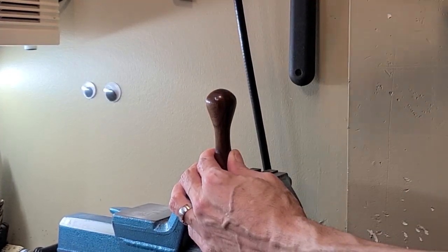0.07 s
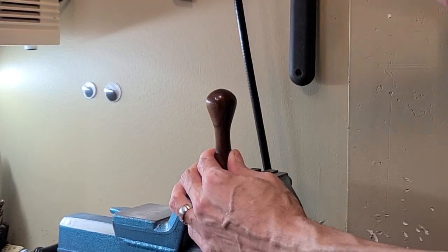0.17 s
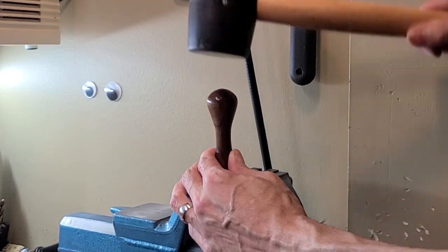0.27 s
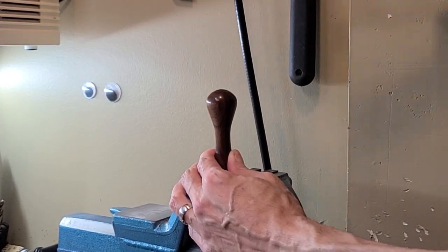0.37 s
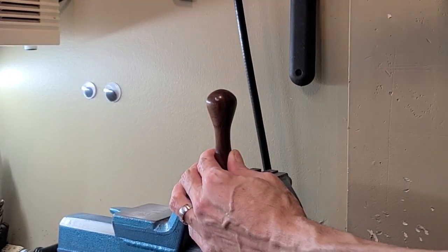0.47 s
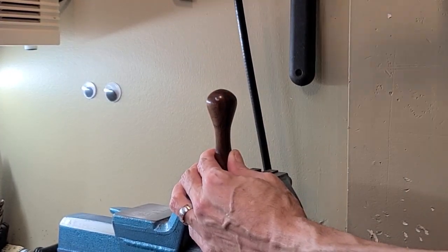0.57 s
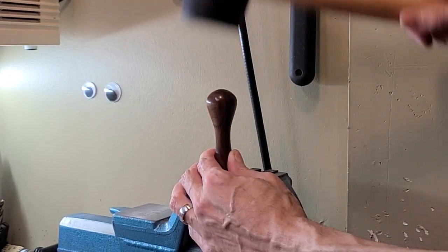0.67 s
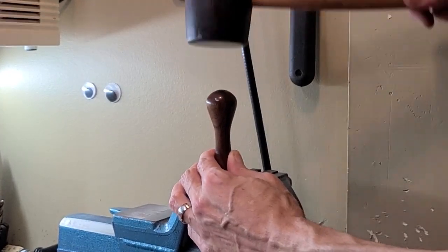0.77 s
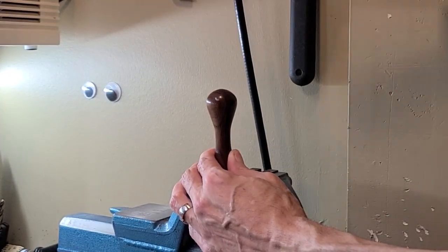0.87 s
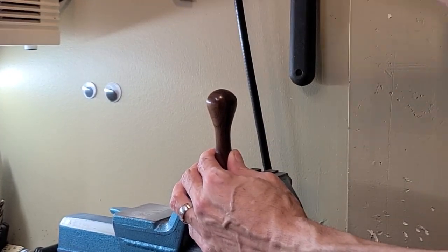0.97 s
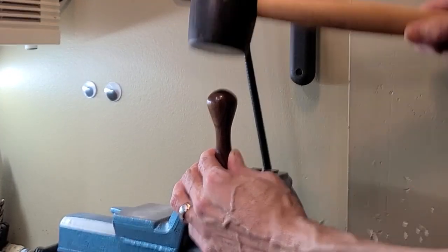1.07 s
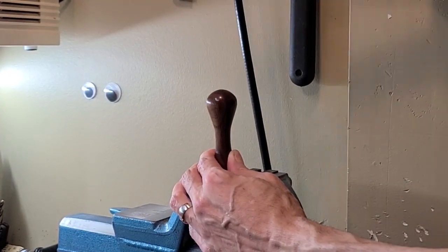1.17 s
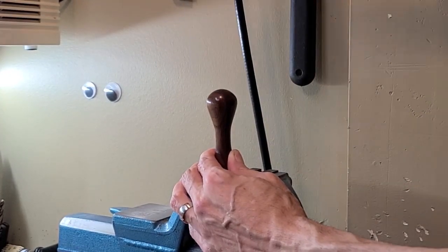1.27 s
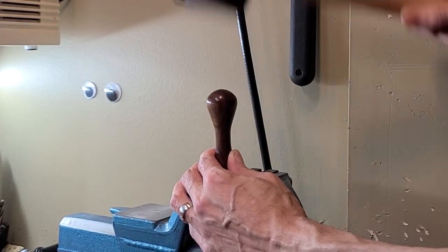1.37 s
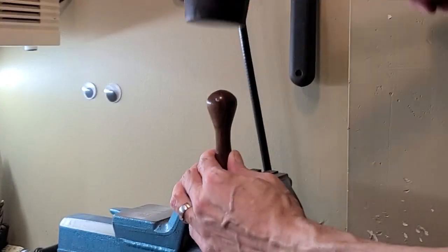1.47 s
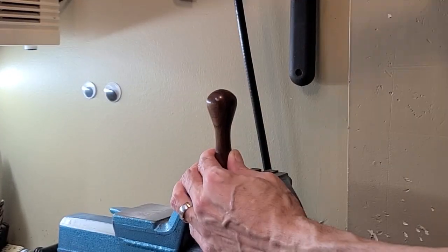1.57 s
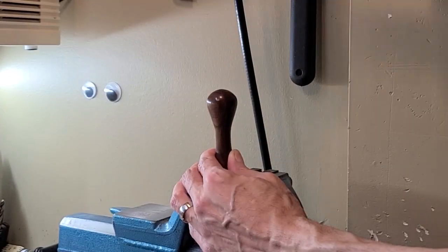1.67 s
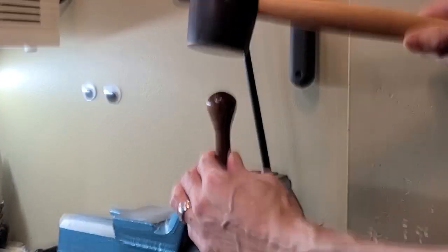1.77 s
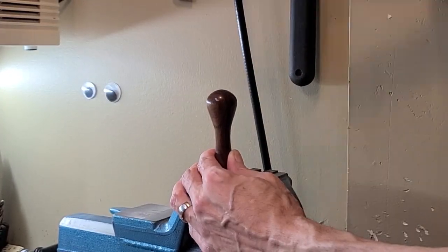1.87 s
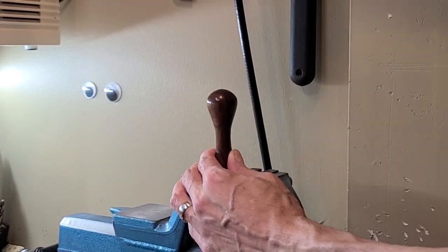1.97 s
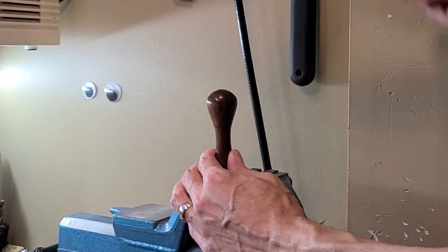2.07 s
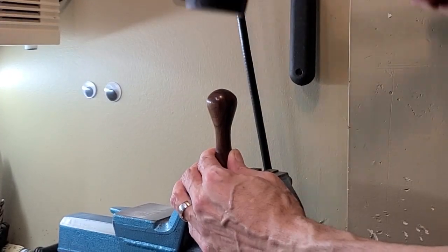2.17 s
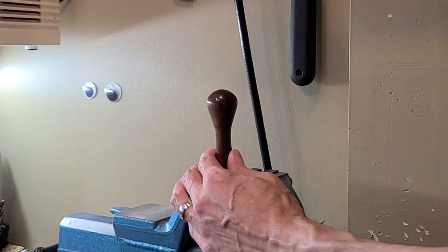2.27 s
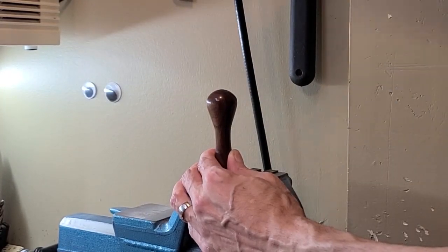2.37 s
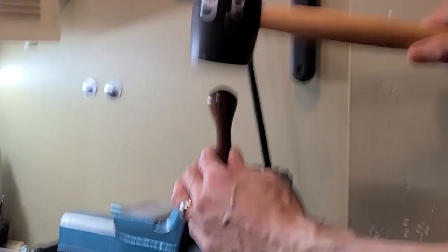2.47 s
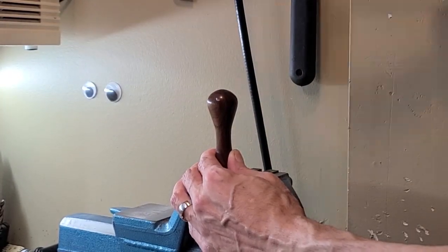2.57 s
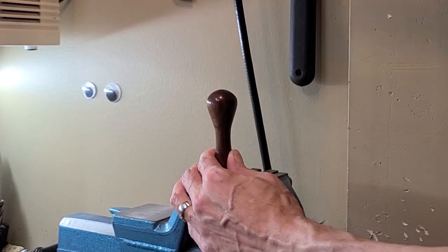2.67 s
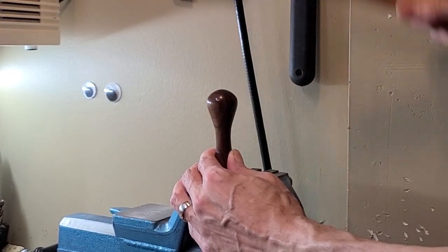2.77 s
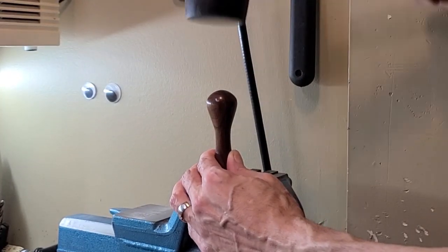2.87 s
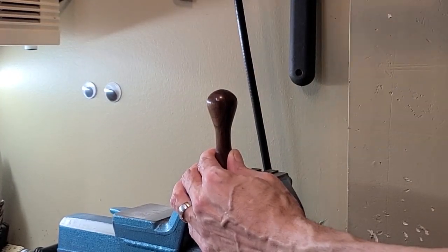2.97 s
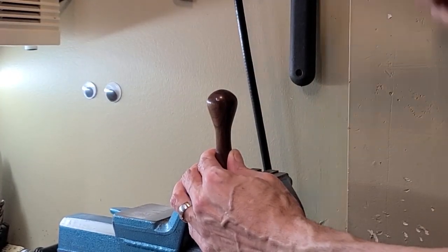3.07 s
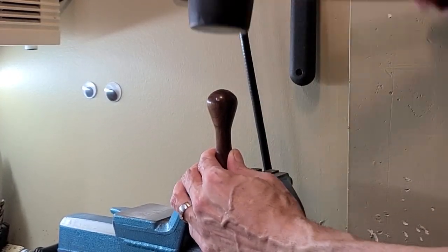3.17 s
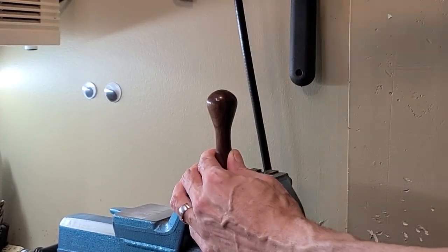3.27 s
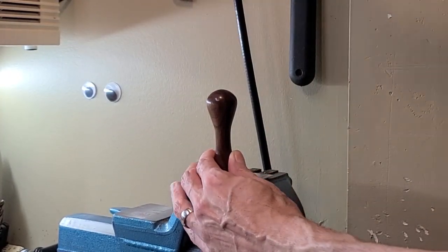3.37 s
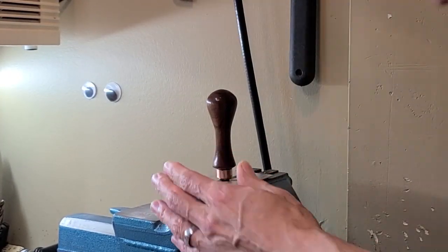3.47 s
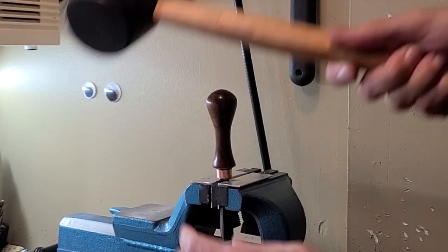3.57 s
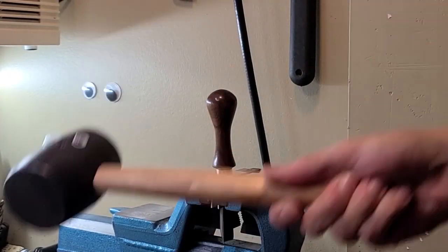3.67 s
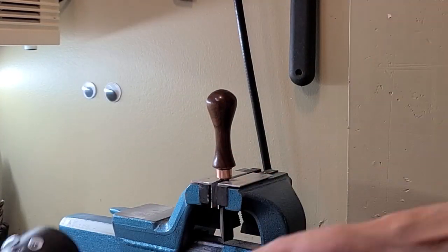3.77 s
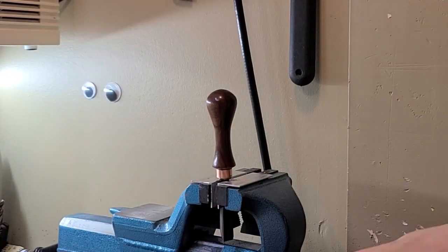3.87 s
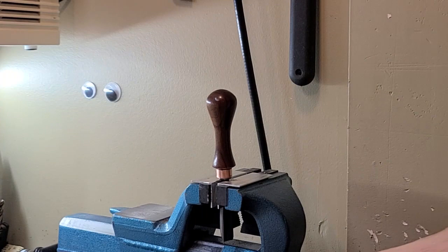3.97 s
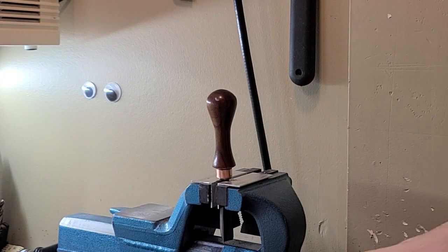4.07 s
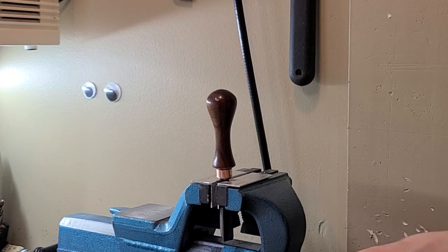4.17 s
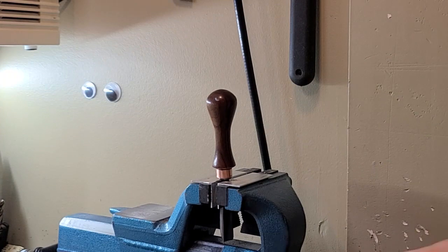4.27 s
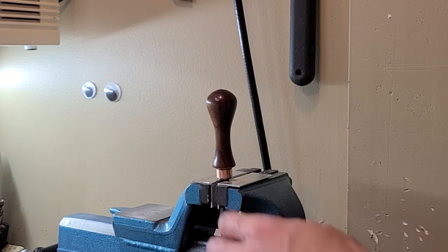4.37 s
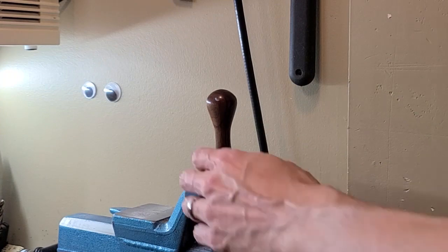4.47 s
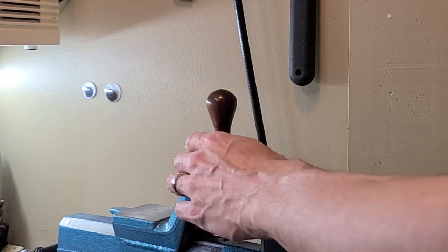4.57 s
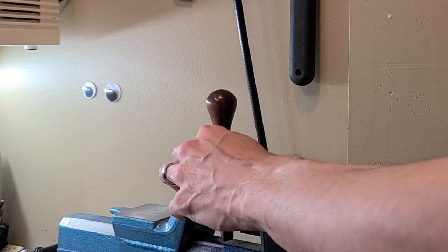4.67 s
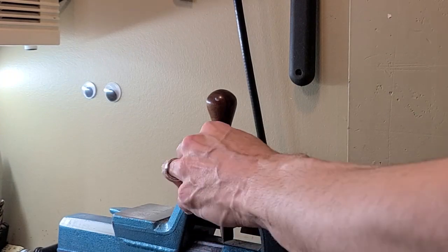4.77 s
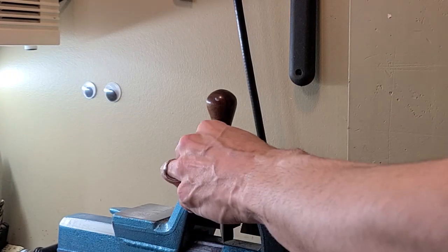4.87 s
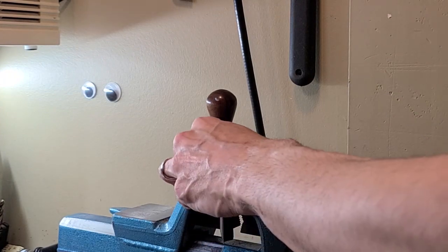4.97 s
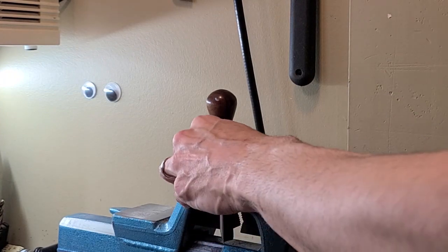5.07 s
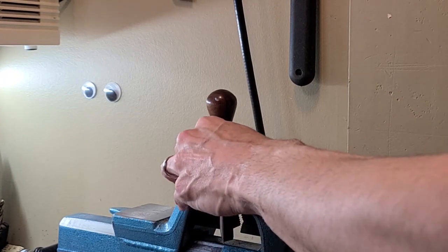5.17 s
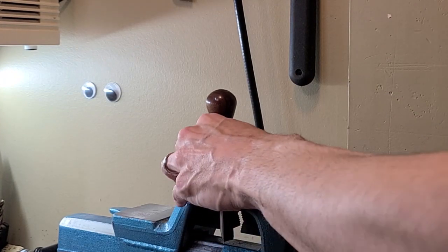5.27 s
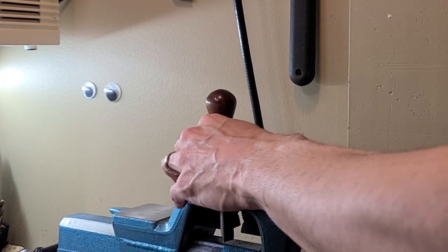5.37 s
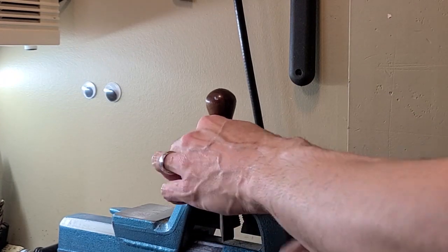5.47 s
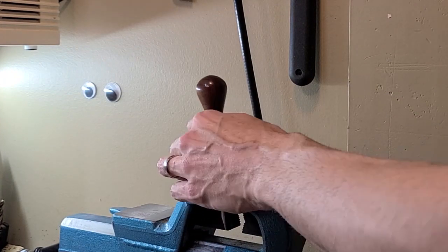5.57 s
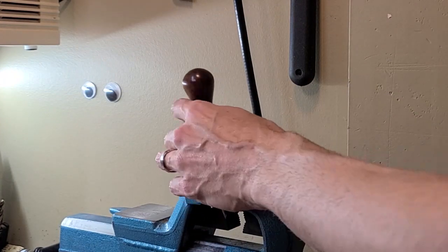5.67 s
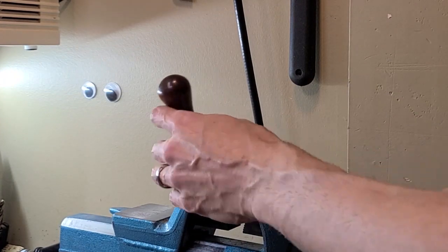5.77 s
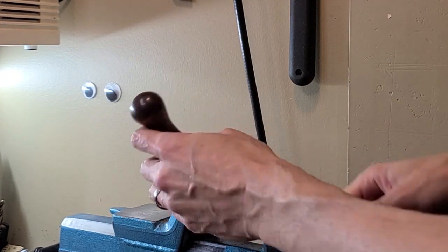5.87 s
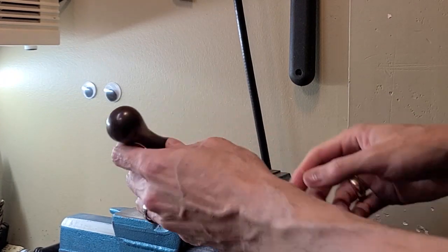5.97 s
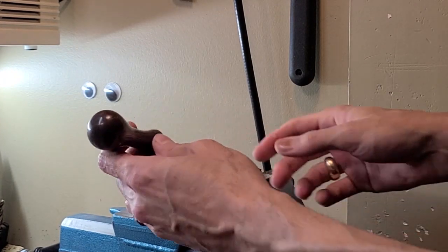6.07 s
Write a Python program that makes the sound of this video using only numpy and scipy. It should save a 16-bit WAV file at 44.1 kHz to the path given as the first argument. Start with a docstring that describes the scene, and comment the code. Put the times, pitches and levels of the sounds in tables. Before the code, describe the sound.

A steady run of close, loud mallet blows lands on a wooden handle held in a bench vice, each a deep thud and woody knock with a brief jingle of small steel parts. The hammering stops after about three seconds. Much quieter handling follows in the still workshop: a ringing clink from the vice, a few bumps, skin rubbing on wood, a short steel scrape as the tool comes free, and some light ticks.

```python
"""A small workshop: a rubber mallet drives a wooden handle onto a tool clamped in a bench vice.
Each blow thumps the bench, knocks in the wood and shakes loose hardware into a short rattle.
Then steel clinks, a hand takes hold, the vice is loosened and the tool scrapes out of its jaws.
Impacts are decaying modes and noise bursts; friction is grainy noise. Air and hum lie underneath."""
import sys
import numpy as np
from scipy import signal
from scipy.fft import rfft, irfft, next_fast_len
from scipy.io import wavfile

SR = 44100
rng = np.random.default_rng(int(sys.argv[2]) if len(sys.argv) > 2 else 0)


def store_wav(level_fs):
    """Save 16-bit WAV to argv[1]."""
    pcm = np.round(np.clip(np.atleast_2d(level_fs), -1, 1) * 32767)
    wavfile.write(sys.argv[1], SR, pcm.T.astype(np.int16))


N = 270320
T = np.arange(N) / SR
RING_T = T[:int(1.4 * SR)]

# mallet blows: start_s, level_db, crack_db
BLOW_HITS = [(-.058, -2, -20), (0.2822, -2.5, 9.5), (0.741, -1.5, -26.5), (1.0856, -2, 0), (1.438, -1, -30),
             (1.79, -1.5, -7.5), (2.151, -1.5, -38.5), (2.5037, -1.5, -32.5), (2.8386, -2, -15.5),
             (3.1523, -2, -36.5)]
# bench, vice and handle as one body: pitch_hz, level_db, t60_s
BENCH_MODES = [(41.4, -21.5, 0.19), (42.62, -26, 1), (70.8, -19, 0.45), (88.2, -7.5, 0.15),
               (105.9, -17, 0.028), (113, -10.5, 0.18), (174, -31.5, 0.095), (219.8, -21, 0.22),
               (244.9, -16.5, 0.17), (314, -15, 0.17), (386, -27, 0.1), (419, -21.5, 0.2),
               (448.7, -13, 0.11), (502.3, -24.5, 0.204), (548, -30.5, 0.29), (589.3, -13.5, 0.096),
               (585, -24, 0.17), (648, -27.5, 0.092), (775.6, -19.5, 0.14), (829.5, -19.5, 0.133),
               (878, -24, 0.12), (1024, -25.5, 0.18), (1151, -31.5, 0.29), (1404, -29.5, 0.21),
               (1427, -35, 0.064), (1670, -22, 0.026)]
# dense resonances of wood, vice and room: freq_hz, octave_level_db, t60_s
KNOCK_BANDS = [(63.3, -34.5, 0.58), (248.5, -27.5, 0.2), (550, -25, 0.21), (960, -20, 0.077),
               (1690, -25.5, 0.15), (2400, -31.5, 0.2), (4096, -38.5, 0.21), (7540, -38, 0.044),
               (10000, -49, 0.089), (16070, -37.5, .1)]
# wood slipping on the tang: freq_hz, octave_level_db, t60_s
CRACK_BANDS = [(504.8, -44, .05), (1598, -33.5, .08), (3020, -32, 0.22), (4960, -32.5, 0.18),
               (6600, -19, 0.068), (9200, -31.5, 0.051), (12400, -29, 0.097), (15000, -34.5, .07)]

def mallet(seated_db=8, cushion_db=5, seating_blows=5.4, shared_power=0.72, rattle_db=2.5):
    """Blows ring bench and wood and throw the hardware; the handle cushions less as it seats."""
    out = np.zeros((2, N))
    bench = ring(BENCH_MODES, spread_hz=1200) * rise(RING_T, 0.00012)
    wood = burst(KNOCK_BANDS)
    parts = ring(HARDWARE_MODES, spread_hz=1400) * undb(-50)
    t = T[:wood.shape[1]]
    rubber_squash = rise(t, 0.003)
    for k, (start_s, level_db, crack_db) in enumerate(BLOW_HITS):
        loss_db = cushion_db * np.exp(-(k / seating_blows) ** 2)
        knock = np.sqrt(shared_power) * wood + np.sqrt(1 - shared_power) * burst(KNOCK_BANDS)
        add(out, start_s, undb(level_db) * shove())
        add(out, start_s, -undb(level_db) * bench)
        add(out, start_s, undb(level_db + seated_db - loss_db) * rubber_squash * knock)
        add(out, start_s, undb(level_db + rattle_db - 0.48 * loss_db) * rattle(t, parts))
        add(out, start_s, undb(crack_db) * burst(CRACK_BANDS) * rise(t, 0.00052))
    return out


def shove(level_db=-9, length_s=0.0032):
    """The handle jerks down and stops: one swing of pressure."""
    phase = np.pi * T[:int(length_s * SR)] / length_s
    return -undb(level_db) * np.sin(2 * phase) * np.sin(phase)


# loose hardware on the bench: freq_hz, octave_level_db, t60_s
RATTLE_BANDS = [(400, -54, 0.72), (900, -46, 0.36), (1400, -43.5, 0.3), (2340, -48, 0.34),
                (4220, -36.5, 0.29), (5130, -43, 0.29), (6140, -34, 0.31), (8440, -34, 0.24),
                (9300, -44, 0.26), (11900, -38, 0.24), (14000, -46, 0.25), (15120, -41, .2)]
# loose steel parts: pitch_hz, level_db, t60_s
HARDWARE_MODES = [(990, -9, .18), (1378, -2, .2), (1452, -8, .14), (1665, -7, .08), (1925, -8, .06),
                  (2079, -7, .08), (3547, -12, .13), (4166, -4, .16), (6240, -3, .15), (6325, -3, .16),
                  (8240, -4, .13), (11300, -11, .11)]

def rattle(t, parts, lift_s=0.0093, land_s=0.078, settle_s=0.2):
    """Hardware is thrown up, chatters, swells as it lands and comes to rest."""
    thrown = rise(t, lift_s) * (1 + 1.78 * (1 - np.exp(-(t / 0.024) ** 2)))
    landing = 1 + undb(-6) * np.exp(-((t - land_s) / 0.0068) ** 2)
    settling = 1 / np.sqrt(1 + (t / settle_s) ** 6)
    clatter = burst(RATTLE_BANDS) * grain(len(t), rate_hz=180, depth_db=3)
    steel = chatter(thrown * np.exp(-t / 0.028), parts, rate_hz=1100)
    return clatter * thrown * landing * settling + steel


# plate buzzes: start_s, level_db, length_s
PLATE_BUZZES = [(0.426, -58.5, 0.034), (0.794, -32.5, 0.022), (1.905, -41.5, 0.018), (2.619, -46.5, 0.055)]
# loose plate: pitch_hz, level_db, t60_s
PLATE_MODES = [(1010, -9, .1), (1345, -7, .09), (1382, -3, .13), (1450, -8, .1), (1560, -12, .08),
               (1830, -18, .08), (4166, -15, .08)]

def loose_plate():
    """A plate taps against the shaking bench after some blows."""
    out = np.zeros((2, N))
    plate = ring(PLATE_MODES, spread_hz=330)
    for start_s, level_db, length_s in PLATE_BUZZES:
        add(out, start_s, undb(level_db) * chatter(RING_T < length_s, plate, rate_hz=650) / 2)
    return out


# ticks of loose parts: start_s, level_db, pin_db
TICK_HITS = [(.134, -56, -73), (0.908, -52.5, -60), (1.579, -52.5, -59), (2.568, -30.5, -57),
             (3.093, -60, -79), (4.588, -35, -64), (5.838, -49.5, -57), (5.958, -52, -52),
             (6.089, -58.5, -47)]
# small steel parts touching: freq_hz, octave_level_db, t60_s
TICK_BANDS = [(1500, -16, .1), (3000, -10, .12), (4500, -2, .14), (5400, -6, .13), (7000, 0, .13),
              (9500, -13, .1), (15000, -22, .08)]
# small steel pin: pitch_hz, level_db, t60_s
PIN_MODES = [(770, -10, .06), (1340, -2, .07), (4265, -4, .1), (4525, 0, .11), (6680, -10, .1),
             (8020, -6, .1)]
# bumps on the vice: start_s, level_db, tilt_db_per_octave, handle_db
BUMP_HITS = [(4.261, -35, 1, -43.5), (4.583, -38, 1, -40), (5.27, -43, -2.5, -61), (5.345, -37, -1, -55),
             (5.367, -36.5, 4, -37.5), (5.401, -35.5, 2, -64), (5.498, -31, 0, -61),
             (5.609, -25.5, -1.5, -24), (5.641, -40.5, -3.5, -30.5), (5.718, -42, -2.5, -25.5),
             (5.733, -48.5, -5, -30.5)]
# hand and tool against the vice: freq_hz, octave_level_db, t60_s
BUMP_BANDS = [(50.25, -22, 0.48), (102, -5.5, 0.29), (210, -16.5, 0.29), (500, -13.5, 0.23),
              (900, -8.5, 0.11), (1220, -2.5, .15), (1580, -2, 0.11), (2630, -3.5, 0.15),
              (6400, -11, 0.086), (8850, -33, 0.064), (16000, -33, 0.079)]
# hollow knock of the handle: pitch_hz, level_db, t60_s
HANDLE_MODES = [(219.2, -10, 0.2), (324, -3, 0.05), (439, -3, 0.05), (492, -4.5, 0.078),
                (615.6, -4.5, 0.04), (767, -7.5, 0.074), (1113, -7, 0.052)]
# clinks of the bar: start_s, level_db
BAR_CLINKS = [(4.261, -27.5), (5.399, -46.5)]
# steel bar: pitch_hz, level_db, t60_s
BAR_MODES = [(301, -3, .08), (581, -22, .32), (1130, -4, .07), (1210, -6, .06), (1410, -19, .42),
             (1750, -2, .04), (2950, 0, .025), (3300, -2, .025), (2509, -2, .33), (2512.5, -8, .28),
             (2665, -12, .38), (3095, -8, .13), (3569, -10, .32), (3984, -15, .32), (4651, -28, .48),
             (5857, -15, .22), (6848, -24, .35), (7967, -22, .12), (8845, -42, .45), (10290, -26, .22),
             (13380, -42, .28)]
# blade coming free: start_s, level_db
BLADE_PINGS = [(5.37, -53.5)]
# blade: pitch_hz, level_db, t60_s
BLADE_MODES = [(3120, 16, 0.024), (4680, 6, 0.079), (7130, 6, 0.08), (8010, -23, .08), (11480, 9, 0.11)]

def handling():
    """Loose parts tick; bumps on the vice ring the handle, bar and blade."""
    out = np.zeros((2, N))
    bodies = BAR_MODES, PIN_MODES, HANDLE_MODES, BLADE_MODES
    bar, pin, handle, blade = (ring(modes, spread_hz=1400) for modes in bodies)
    for start_s, level_db, pin_db in TICK_HITS:
        add(out, start_s, undb(level_db) * burst(TICK_BANDS))
        add(out, start_s, undb(pin_db) * pin)
    for start_s, level_db, tilt, handle_db in BUMP_HITS:
        bump = burst([(hz, db + tilt * np.log2(hz / 1000), t60_s) for hz, db, t60_s in BUMP_BANDS])
        t = T[:bump.shape[1]]
        contact = rise(t, 0.00089) * grain(len(t), rate_hz=280, depth_db=1.5)
        add(out, start_s, undb(level_db) * bump * contact)
        add(out, start_s, undb(handle_db) * handle)
    for start_s, level_db in BAR_CLINKS:
        add(out, start_s, undb(level_db) * bar * pan(left_db=-3.5))
    for start_s, level_db in BLADE_PINGS:
        add(out, start_s, undb(level_db) * blade)
    return out


# gripping, opening the vice, drawing the tool out: start_s, length_s, rub_db, scrape_db
SLIDE_STROKES = [(4.002, 0.064, -78, -76), (4.565, .02, -58, -42), (4.955, 0.11, -52.5, -75.5),
                 (5.243, 0.097, -47.5, -77), (5.334, 0.11, -45.5, -68), (5.462, .04, -41.5, -65),
                 (5.509, 0.27, -47.5, -51.5), (5.594, 0.054, -36.5, -32), (5.718, 0.017, -44, -42.5),
                 (5.792, .19, -60, -60.5)]
# skin on wood: freq_hz, octave_level_db
RUB_SPECTRUM = [(50, -9), (110, -7.5), (250, -6.5), (550, 4), (1200, -6), (2500, -30.5), (6000, -23),
                (15000, -61)]
# steel in the jaws: freq_hz, octave_level_db
SCRAPE_SPECTRUM = [(800, -10), (2500, -8), (4500, -7), (6000, -2), (7800, 1), (9000, -12.5), (15000, -10)]

def sliding(attack_s=0.026, release_s=0.016, blade_db=-17):
    """The hand rubs the handle; the blade scrapes through the jaws in tiny slips that ring it."""
    rub, scrape = np.zeros((2, N))
    for start_s, length_s, rub_db, scrape_db in SLIDE_STROKES:
        attack = np.clip((T - start_s) / attack_s, 0, 1) ** 2
        pressure = attack * np.exp(-np.maximum(T - start_s - length_s, 0) / release_s)
        rub += undb(rub_db) * pressure
        scrape += undb(scrape_db) * pressure
    skin = rub * hiss(RUB_SPECTRUM, ripple_db=11.5) * grain(N, rate_hz=150, depth_db=3)
    slips = scrape * hiss(SCRAPE_SPECTRUM, ripple_db=6) * grain(N, rate_hz=130, depth_db=3.5)
    blade = chatter(scrape, ring(BLADE_MODES[:-1], spread_hz=760), rate_hz=190)
    return skin + slips + undb(blade_db) * blade


def dropping_parts(count=2, delay_s=0.19, spread_s=0.12, relative_db=-61, fade_db_per_s=67.5):
    """The last parts drop back after each blow, fainter the later they fall."""
    out = np.zeros((2, N))
    for start_s, blow_db, _ in BLOW_HITS:
        for late_s in spread_s * rng.random(count):
            level_db = blow_db + relative_db - fade_db_per_s * late_s
            add(out, start_s + delay_s + late_s, undb(level_db) * burst(TICK_BANDS))
    return out


# tools hanging nearby: pitch_hz, level_db, t60_s
TOOL_MODES = [(205, -5.5, 1.6), (301, -3.5, 0.57), (443, -3, 2), (471, 4.5, 1.1), (530, -5, 0.68),
              (845, -27, 3.7), (880, -21, 1.6), (1010, -18, .9)]

def hanging_tools(relative_db=-52, jitter_s=0.004):
    """Each blow shakes the hanging tools, which ring on faintly."""
    out = np.zeros((2, N))
    tools = ring(TOOL_MODES, spread_hz=500)
    for start_s, blow_db, _ in BLOW_HITS:
        add(out, start_s + jitter_s * rng.random(), undb(blow_db + relative_db) * tools)
    return out * grain(N, rate_hz=19, depth_db=0.5)


# still air: freq_hz, octave_level_db
AIR_SPECTRUM = [(25, -81), (55, -74), (120, -83), (400, -87), (680, -93), (1000, -88), (2500, -93),
                (3400, -86), (5000, -94), (6600, -81), (9000, -100), (10300, -92), (11700, -93),
                (12300, -103)]
# hum: pitch_hz, level_db
HUM_TONES = [(301, -78), (446, -88)]

def room_tone():
    """Still air and a faint hum, both wavering in level."""
    air = hiss(AIR_SPECTRUM, ripple_db=0) * grain(N, rate_hz=18, depth_db=0.74)
    hum = sum(undb(db) * np.sin(2 * np.pi * hz * T) for hz, db in HUM_TONES)
    return air + hum * grain(N, rate_hz=3.9, depth_db=3.5)


def ring(modes, spread_hz):
    """Decaying modes of alternating sign; higher ones differ more in phase between channels."""
    out = np.zeros((2, len(RING_T)))
    for k, (hz, db, t60_s) in enumerate(modes):
        t = RING_T[:int(1.5 * t60_s * SR)]
        skew = np.arctan(hz / spread_hz) / 2 * rng.choice([-1, 1]) * np.array([[1], [-1]])
        out[:, :len(t)] += (-1) ** k * undb(db - 60 * t / t60_s) * np.sin(2 * np.pi * hz * t + skew)
    return out


def burst(bands, size=16384):
    """Dense resonances struck at once; each band decays at its own rate."""
    hz, spectrum = noise_spectrum(bands, size, ripple_db=2)
    rows, out = np.array(bands), 0
    for selector, t60_s in zip(np.eye(len(rows)), rows[:, 2]):
        band = np.interp(np.log(hz), np.log(rows[:, 0]), selector)
        out += irfft(spectrum * band, size) * undb(-60 * T[:size] / t60_s)
    end_fade = np.minimum(1, 10 * np.linspace(1, 0, size))
    return out * end_fade


def chatter(force, body, rate_hz):
    """Random small impacts, scaled by the force, ring a body."""
    hits = rng.random(len(force)) < rate_hz / SR
    impacts = hits * rng.standard_normal(len(force)) * force
    return signal.fftconvolve(impacts[None], body, axes=1)[:, :len(force)]


def grain(size, rate_hz, depth_db):
    """Randomly wandering gain of rms 1."""
    steps = rng.standard_normal(size // 20)
    gain = undb(depth_db * np.interp(T[:size] * rate_hz, np.arange(len(steps)), steps))
    return gain / np.sqrt(np.mean(gain ** 2))


def hiss(table, ripple_db):
    """Steady coloured stereo noise."""
    size = next_fast_len(N, True)
    _, spectrum = noise_spectrum(table, size, ripple_db)
    return irfft(spectrum, size)[:, :N]


def noise_spectrum(table, size, ripple_db, coherence_hz=950):
    """Coloured stereo spectrum: channels alike in the bass, unrelated in the treble."""
    hz = bin_hz(size)
    common, *sides = rfft(rng.standard_normal((3, size)))
    coherence = 1 / (1 + (hz / coherence_hz) ** 2)
    noise = np.sqrt(coherence) * common + np.sqrt(1 - coherence) * np.array(sides)
    low_cut = 1 / np.sqrt(1 + (table[0][0] / 2 / hz) ** 4)
    peaks = undb(ripple_db * (1 - coherence) * ripple(hz))
    peaks /= np.sqrt(np.mean(peaks ** 2))
    per_octave = np.sqrt(SR / 2 / (hz * np.log(2)))
    return hz, undb(level_at(table, hz)) * low_cut * peaks * per_octave * noise


PEAKS_AND_DIPS = np.clip(rng.standard_normal(2000), -2, 2)

def ripple(hz, width_hz=28, damping=0.004):
    """Peaks and dips shared by hard objects in a small room, widening with frequency."""
    index = np.log1p(hz * damping / width_hz) / damping
    return np.interp(index, np.arange(len(PEAKS_AND_DIPS)), PEAKS_AND_DIPS)


def level_at(table, hz):
    """Table level in dB, interpolated over log frequency."""
    rows = np.array(table)
    return np.interp(np.log(hz), np.log(rows[:, 0]), rows[:, 1])


def add(out, start_s, sound):
    """Mix a sound in, trimmed to the scene."""
    offset = int(round(start_s * SR))
    first, end = max(offset, 0), min(offset + sound.shape[-1], N)
    if end > first:
        out[:, first:end] += sound[..., first - offset:end - offset]


def bin_hz(size):
    return np.maximum(np.fft.rfftfreq(size, 1 / SR), 1)


def rise(t, tau_s):
    return 1 - np.exp(-t / tau_s)


def pan(left_db):
    return undb(np.array([[1], [-1]]) * left_db / 2)


def undb(db):
    return 10 ** (np.asarray(db) / 20)


# left channel over right: freq_hz, level_db
LEFT_BIAS = [(60, 3), (130, 3.5), (250, 1.8), (500, 3), (1000, 1.7), (2000, 2), (4000, 3.5), (8000, 2.5),
             (12000, 6)]

def scene():
    """All sources, placed slightly left."""
    mix = mallet() + loose_plate() + handling() + sliding()
    mix += dropping_parts() + hanging_tools() + room_tone()
    size = next_fast_len(N + SR // 10, True)
    balance = pan(level_at(LEFT_BIAS, bin_hz(size)))
    return irfft(rfft(mix, size) * balance, size)[:, :N]


def record(dry, low_cut_hz=30, high_cut_hz=16000, ceiling=0.7):
    """High-pass, soft clip, steep low-pass."""
    high_pass = signal.butter(1, low_cut_hz, "high", fs=SR, output="sos")
    low_pass = signal.ellip(8, 0.2, 70, high_cut_hz, fs=SR, output="sos")
    rounded = ceiling * np.tanh(signal.sosfilt(high_pass, dry) / ceiling)
    return signal.sosfilt(low_pass, rounded)


dry = scene()
out = record(dry)
store_wav(out)
```